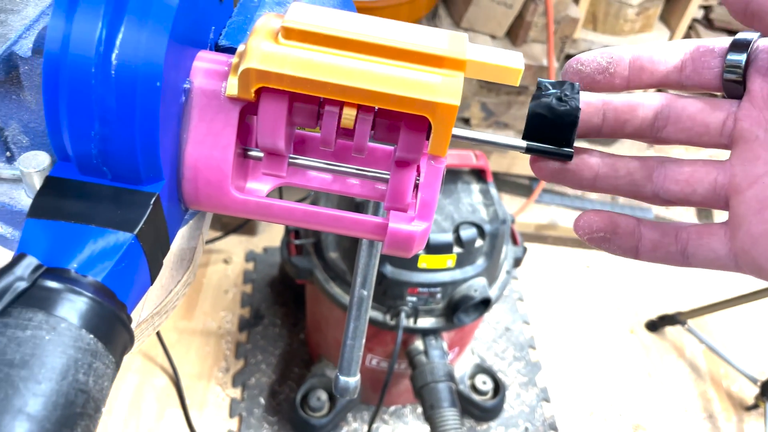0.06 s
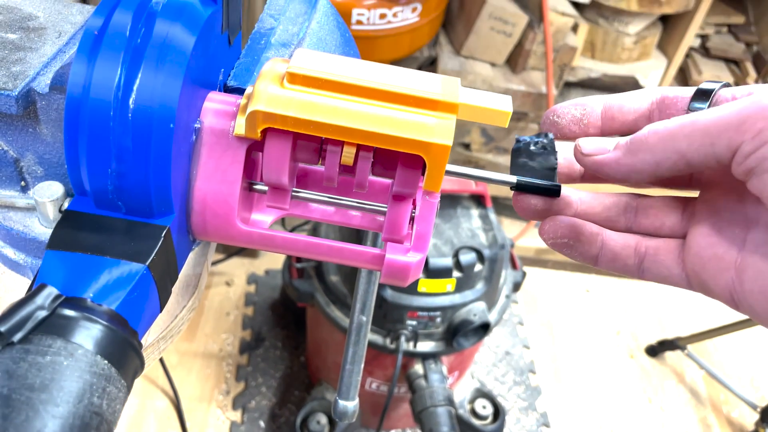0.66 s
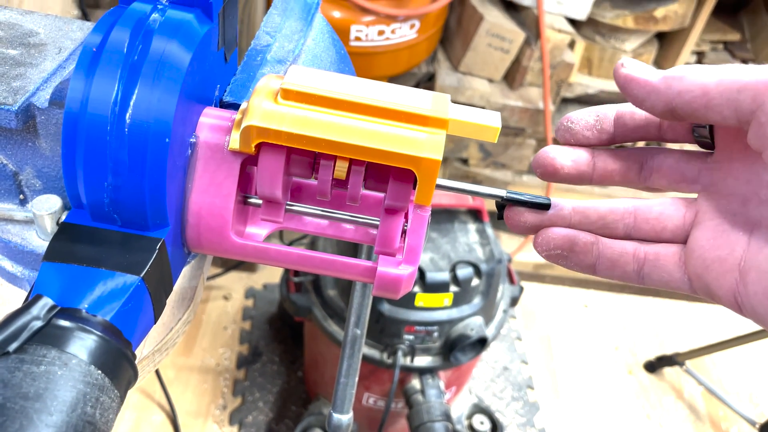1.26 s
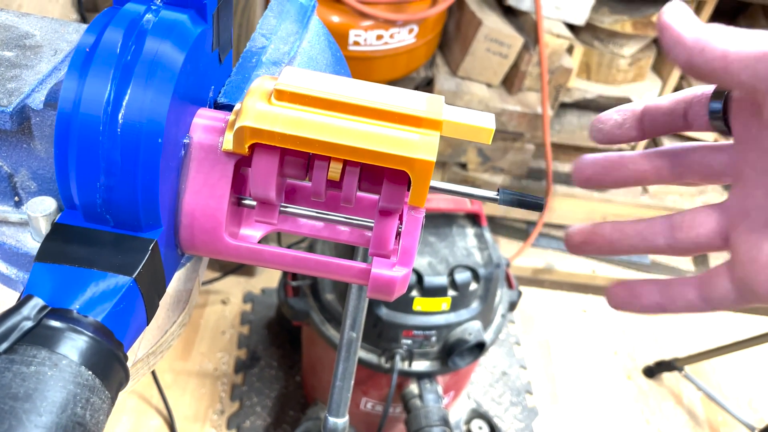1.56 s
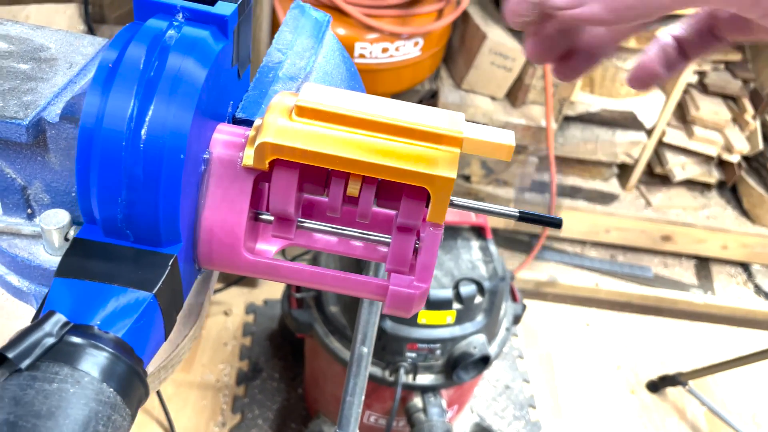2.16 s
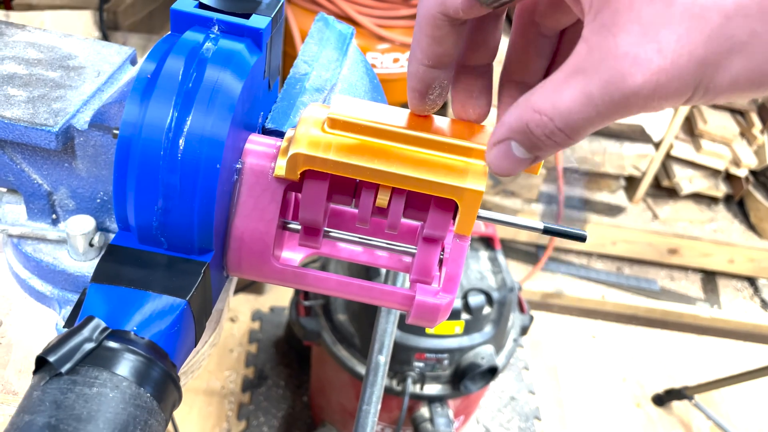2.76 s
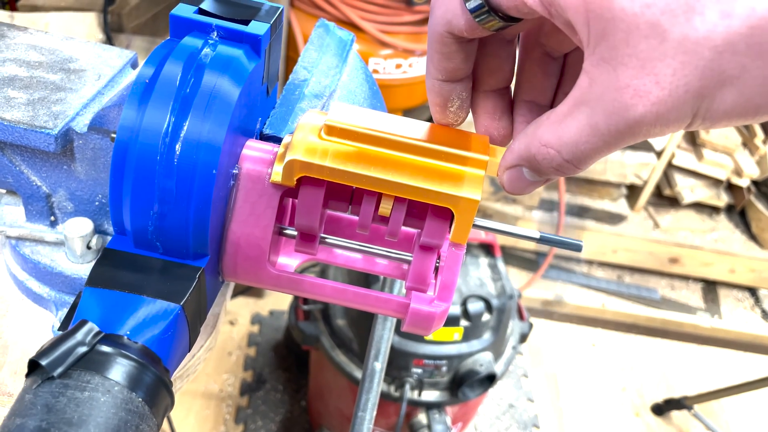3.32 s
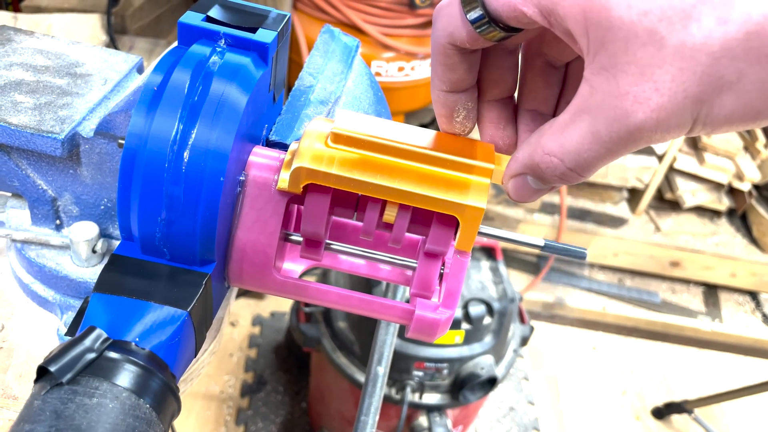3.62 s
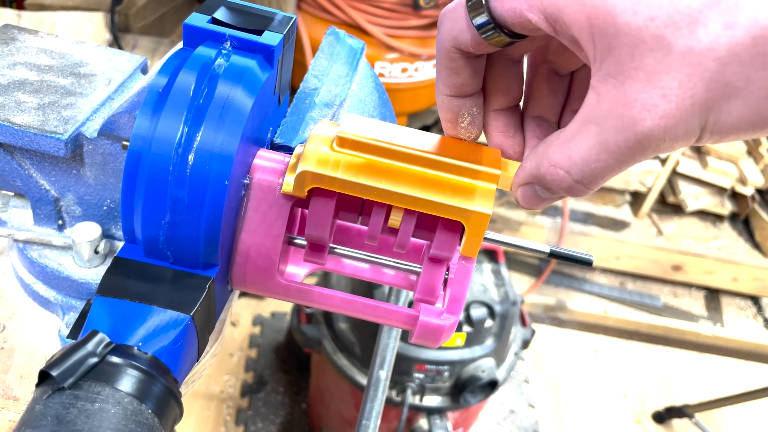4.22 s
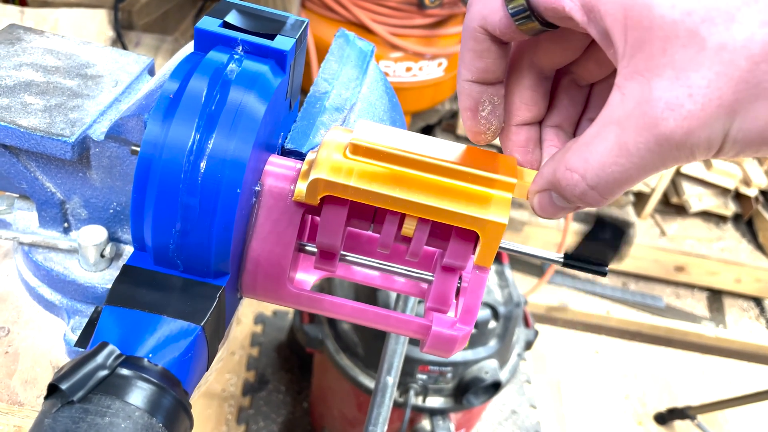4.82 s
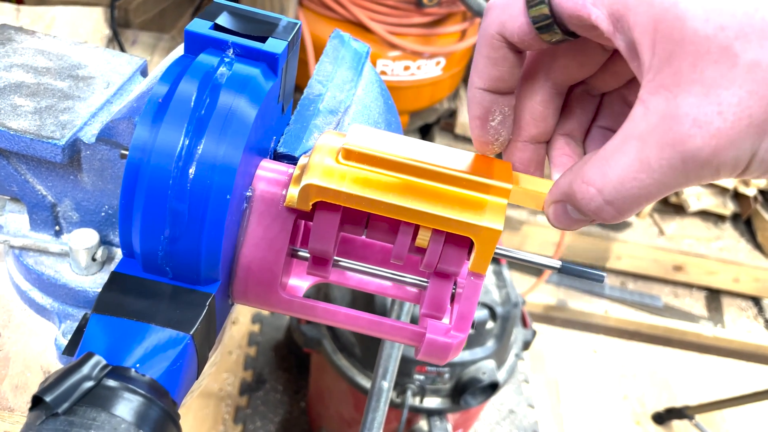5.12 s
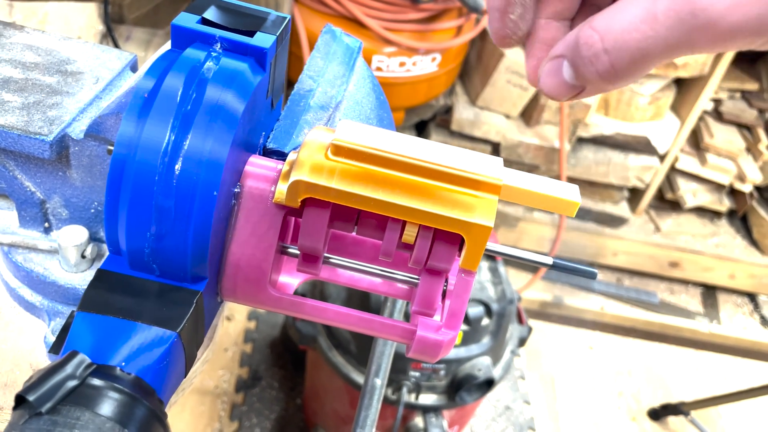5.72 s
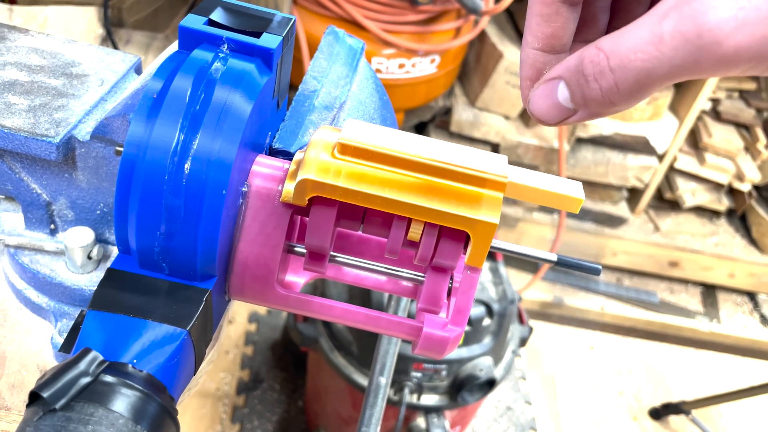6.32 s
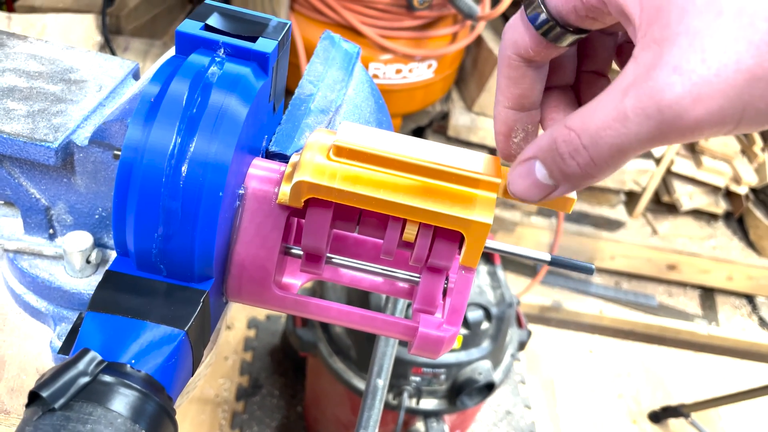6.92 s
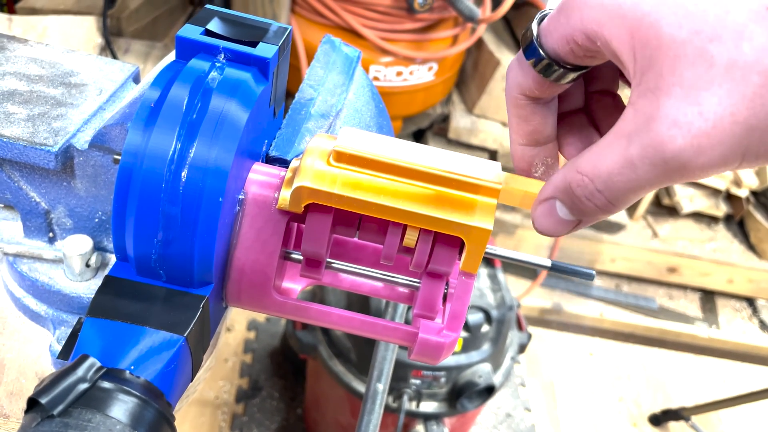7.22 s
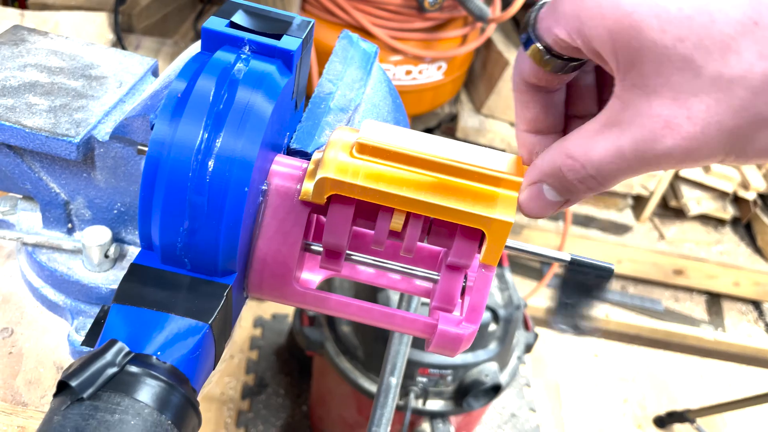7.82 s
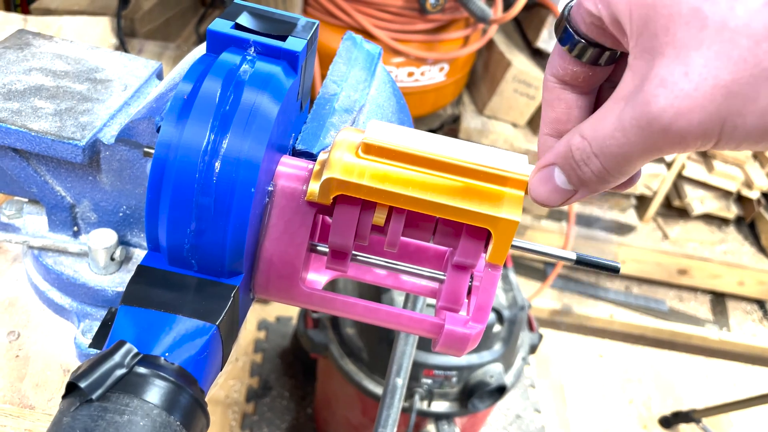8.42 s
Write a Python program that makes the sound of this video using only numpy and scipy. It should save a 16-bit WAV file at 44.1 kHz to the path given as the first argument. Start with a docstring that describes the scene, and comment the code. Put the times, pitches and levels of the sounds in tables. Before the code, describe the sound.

Close up on a workbench, a small air turbine spins with a high, whistling whine over the constant drone and rushing air of a shop vacuum. Midway, a plastic gearbox is shifted and its teeth grind in several stretches while the whine wavers and sinks and the whistle fades. Then the rasp ends, the pitch rises again, and a faint shaft hum sounds briefly as the vacuum runs on.

```python
"""On a workbench, a shop vacuum sucks air through a small plastic turbine that drives a plastic gearbox.
Over the vacuum's hum, roar and hiss the blades whine, swelling and dipping in the wall echoes.
The housing whistles, and rings when an overtone sweeps through its resonance.
A hand shifts the gears: they rasp, the turbine sags and recovers, and the slow shaft hums while engaged."""
import sys
import numpy as np
from scipy import signal
from scipy.fft import rfft, irfft, next_fast_len
from scipy.io import wavfile
from scipy.ndimage import uniform_filter1d, map_coordinates

SR = 44100
rng = np.random.default_rng(int(sys.argv[2]) if len(sys.argv) > 2 else 0)


def output_pcm(signal):
    """Save a mono or channel-first signal as 16-bit PCM at the path in sys.argv[1].

    Samples are clipped to [-1, 1] before scaling.
    """
    pcm = np.clip(np.atleast_2d(signal).T, -1, 1) * 32767
    wavfile.write(sys.argv[1], SR, np.round(pcm).astype(np.int16))


N = 382347
FREE_HZ = 1183  # blade rate with no load
# treble comes straight from the turbine and reaches the right microphone first: f/Hz, left lead/rad
TREBLE_LEAD = [(5800, 0), (7000, -1.6), (8300, -3.14), (9600, -4.7), (11600, -6.28), (13200, -7.85),
               (14700, -9.42), (15800, -10.5)]


def amp(db):
    """Decibels to gain."""
    return 10 ** (np.asarray(db) / 20)


def unit(x):
    """Scale to rms 1."""
    return x / np.sqrt(np.mean(x ** 2) + 1e-20)


def along(points, hz):
    """Read (f/Hz, value) points on a log axis."""
    f, v = np.transpose(points)
    return np.interp(np.log(hz + 1), np.log(f + 1), v)


def curve(points):
    """Read (t/s, value) points at every sample."""
    return np.interp(np.arange(N) / SR, *np.transpose(points))


def wobble(rate):
    """A smooth random curve, rate knots a second."""
    return map_coordinates(rng.standard_normal(int(N * rate / SR) + 4), [np.arange(N) * rate / SR])


def gate(start, end, rise_s, fall_s):
    """Fully open by the start, fading after the end."""
    t = np.arange(N) / SR
    return np.clip(np.minimum(1 + (t - start) / rise_s, 1 - (t - end) / fall_s), 0, 1)


def filtered(x, response):
    """Shape x by a frequency response."""
    m = next_fast_len(N + 8192)
    return irfft(rfft(x, m) * response(np.fft.rfftfreq(m, 1 / SR)), m)[..., :N]


def resonant(points, modes, hz):
    """A smooth spectrum in dB with resonance peaks on it."""
    peaks = sum((amp(db) ** 2 - 1) / (1 + (2 * (hz - centre) / width) ** 2) ** 1.49
                for centre, width, db in modes)
    return along(points, hz) + 10 * np.log10(np.abs(1 + peaks))


def angle(hz):
    """Running phase of a gliding pitch."""
    return 2 * np.pi * np.cumsum(hz) / SR


def tone(phase, pan_db, lead):
    """A stereo sine, louder on the left by pan_db and earlier by lead radians."""
    side = np.array([[.5], [-.5]])
    return np.sqrt(2) * amp(side * pan_db) * np.sin(phase + side * lead)


def rush(colour_db, patchy_db):
    """Stereo noise of rms 1 with turbulent patches."""
    likeness = [(60, .97), (300, .92), (900, .75), (1500, .7), (2500, .35), (4200, .88), (6000, .8),
                (7700, .99)]  # f/Hz, left-right likeness
    balance = [(400, -.5), (700, -1), (1150, 4.5), (1600, 0.5), (2300, 9), (3300, 4.5), (4200, 3.5),
               (5500, 5.5), (6800, -1.5), (7700, 0)]  # f/Hz, L-R/dB
    noise = signal.stft(rng.standard_normal((2, N)), nperseg=512)[2]
    patches = uniform_filter1d(rng.standard_normal(noise.shape[1:]), size=5, axis=0)
    patches = unit(uniform_filter1d(patches, size=12, axis=1))
    pair = signal.istft(noise * amp(patchy_db * patches), nperseg=512)[1][:, :N]
    spread = lambda hz: np.arccos(np.clip(along(likeness, hz), -1, 1)) / 2
    mid, side = filtered(pair, lambda hz: amp(colour_db(hz)) * [np.cos(spread(hz)), np.sin(spread(hz))])
    half = np.array([[.5], [-.5]])
    place = lambda hz: amp(half * along(balance, hz)) * np.exp(1j * half * along(TREBLE_LEAD, hz))
    return unit(filtered(np.array([mid + side, mid - side]), place))


def turbine(blade_hz, load):
    """The blades whine; chattering gears shake the rotor, so the pitch wavers."""
    overtones = [(3, -39.5), (4, -35.5), (5, -36.5), (6, -37), (7, -44), (8, -44.5), (9, -47), (10, -46.5),
                 (11, -47), (12, -45.5), (13, -46.5), (14, -48), (15, -52), (16, -52)]  # ahead of the housing's lift: multiple, relative level/dB
    octaves = np.log2(blade_hz / FREE_HZ)
    shake = (.01 + .015 * load) * wobble(170) + .07 * load * wobble(55)
    phase = angle(blade_hz * (1 + 0.000485 * wobble(14) + .002 * load * wobble(45))) + shake
    blade = amp(-30.5 + 6 * octaves + swell(1) + (0.5 + 1.4 * load) * wobble(30))
    second = amp(-36.5 + 8.5 * octaves + swell(2) + (1 + 2.4 * load) * wobble(30))
    whine = blade * tone(phase, pan_db=6.5, lead=0.24) + second * overtone(2, phase, blade_hz)
    whine += amp(0.5) * wall_echoes(blade * np.sqrt(2) * np.sin(phase))
    # the uneven rotor adds a faint tone between the blade tones
    blades, rotor_order = 6, 11
    rotor = amp(-46.5 - 6.1 * load + 3.4 * wobble(8))
    whine += rotor * tone(phase * rotor_order / blades, pan_db=6.5, lead=2.5)
    for k, db in overtones:
        hz = k * blade_hz
        level_db = db - 3 + housing(hz, blade_hz, load) + octaves + swell(k)
        # the shrillest overtones sink into the hiss as the turbine sags
        sheen_db = 11 * octaves * np.clip((hz - 8000) / 1000, 0, 1)
        # turbulence makes the short waves flutter most
        flutter_db = (0.65 + 0.096 * k + 0.74 * load) * wobble(22) + wobble(90) + wobble(5)
        whine += amp(level_db + sheen_db + flutter_db) * overtone(k, phase, blade_hz)
    return whine


def swell(k):
    """Lift in dB as multiple k of the blade tone flares or fades for a while."""
    swells = { 1: [(3.92, 3.94, -1), (4.2, 4.29, -1.5), (4.4, 4.47, -4), (4.96, 5.02, 4.5),
              (5.88, 5.95, -2.5), (6.19, 6.21, -4)], 2: [(1.597, 2.53, 6), (3.14, 3.17, -4),
              (3.39, 3.56, -3.5), (3.61, 3.67, 5), (3.76, 3.81, -12), (4.04, 4.09, -2), (4.45, 4.54, -6),
              (4.65, 4.97, 4), (5.27, 5.29, -4), (5.4, 5.415, -5), (5.545, 5.56, -8), (5.6, 5.63, 5),
              (5.67, 5.73, -12), (5.96, 6.02, 6), (6.08, 6.11, -13), (6.19, 6.28, 2), (6.33, 6.36, -5),
              (6.42, 7.87, 3.5), (6.7, 6.73, -5), (7.38, 7.42, -6)], 3: [(0.35, 0.53, -9), (1.55, 1.72, -6),
              (2.2, 2.33, 3.5), (2.56, 3.12, -3), (4.24, 4.31, 8), (5.9, 6.1, 5.5), (6.19, 6.24, -7),
              (7.8, 8.67, -3.5), (7.81, 7.87, -3), (8.1, 8.14, -9)], 4: [(1.65, 2.0, -4), (2.12, 2.2, 3),
              (3.26, 3.33, 2), (3.37, 3.47, -4), (3.9, 3.95, -9), (4.4, 5.36, -4), (5.45, 5.78, 2.5),
              (5.98, 6.11, -3), (6.14, 6.28, 4), (7.45, 7.72, 2.5)], 5: [(1.66, 2.05, -6), (4.3, 5.22, 1),
              (5.28, 5.35, 2.5), (5.41, 5.46, 0), (5.62, 5.7, 4), (5.9, 6.42, -9), (6.5, 7.7, 0.5),
              (8.0, 8.6, -3)], 6: [(3.35, 3.55, -1.5), (4.88, 4.97, -1), (5.07, 5.22, -6), (6.33, 6.5, -8)],
              8: [(5.27, 5.42, 11)]}  # by multiple: start/s, end/s, lift/dB
    return sum(db * gate(start, end, rise_s=.027, fall_s=.054) for start, end, db in swells.get(k, []))


def overtone(k, phase, blade_hz):
    """Multiple k of the blade tone, placed in stereo by its pitch."""
    pan = [(1500, -3), (2300, 9.5), (3500, 2.5), (4000, 3.5), (4700, 7), (5500, 2), (7000, 4), (7700, 0)]  # f/Hz, L-R/dB
    lead = [(700, .5), (1100, .3), (1200, .9), (1800, .5), (2350, 2.3), (2900, 2.6), (3250, .8), (4200, .2),
            (4700, .7)]  # f/Hz, left lead/rad
    return tone(k * phase, along(pan, k * blade_hz), along(lead + TREBLE_LEAD, k * blade_hz))


def wall_echoes(x):
    """The walls return a tone late, so the mix swells and dips as its pitch slides."""
    walls = [(5.027, .162), (15.802, .315), (17.426, .328), (20.509, .137), (30.59, .147), (48.977, .071)]  # reflections: delay/ms, relative gain
    t = np.arange(N) / SR
    return sum(gain * np.interp(t - ms / 1000, t, x, left=0) for ms, gain in walls)


def housing(hz, blade_hz, load):
    """An overtone's lift in dB; the main resonance spreads upward with the flow, the hand damps it."""
    colour = [(2100, 1), (3000, -1.5), (3500, 1.5), (3950, .5), (4400, -1), (4750, -1.3), (5050, -3),
              (5400, -9), (5900, -3), (6150, 1), (6500, 2), (7100, -16), (8700, -10), (9050, -2), (9450, 5),
              (9900, -7), (10250, -5), (10650, 5), (11200, 1.5), (11850, 6), (12400, 2.5), (13000, 1.5),
              (13600, -4), (15400, -14)]  # f/Hz, lift/dB
    width_hz = 322 * (blade_hz / FREE_HZ) ** 2
    centre_hz = 4081 + 0.71 * width_hz
    peak_db = 17 - 4.5 * load ** 2
    return along(colour, hz) + peak_db / (1 + ((hz - centre_hz) / width_hz) ** 2)


def whistle(blade_hz):
    """The inlet jet locks loosely to the housing resonance and fades as the turbine sags."""
    level_db = np.maximum(-28.5 - 0.04 * (FREE_HZ - blade_hz), -56)
    phase = angle(4160 + 11 * wobble(17) + 23 * wobble(110) + 42 * wobble(450))
    jet = tone(phase, pan_db=2.5, lead=.1)
    sideband = amp(-16.5) * tone(phase + angle(blade_hz), pan_db=-8, lead=0)  # blades chop the jet
    return amp(level_db + 0.33 * wobble(60) + 2.7 * wobble(260)) * (jet + sideband)


def drum_roar(load):
    """Air roars in the vacuum's drum and hose, a little louder under load."""
    bed = [(25, -24), (55, -5), (95, -8), (135, -2.5), (450, 1), (660, -3.5), (1200, 1), (1850, -10.5),
           (4000, -47)]  # roar spectrum: f/Hz, relative level/dB
    drum_modes = [(149, 11, 5), (182, 18, 7.5), (244.5, 26, 8), (304, 22, 7), (350, 10, 1), (463, 53, 3),
                  (826, 100, 11.5)]  # f/Hz, width/Hz, lift/dB
    level_db = -38.5 + load + 0.32 * wobble(6.7)
    return amp(level_db) * rush(lambda hz: resonant(bed, drum_modes, hz), patchy_db=2)


def air_hiss(blade_hz):
    """Air hisses through the turbine housing, louder with speed."""
    bed = [(500, -25), (1300, 1.5), (1850, 1.5), (2600, 5.5), (3600, 0.5), (4800, 2.5), (5900, -0.5),
           (7000, 2.5)]  # hiss spectrum: f/Hz, relative level/dB
    top = [(7450, 2), (7800, -29.5), (8650, -30), (9100, 3.5), (10000, -3.5), (11500, -1.5), (13000, -5),
           (14000, -6), (15800, -41)]  # its fizzy top: f/Hz, relative level/dB
    duct_modes = [(3095, 370, 5), (4200, 470, 17), (5100, 180, 3.5), (6470, 160, 9.5)]  # f/Hz, width/Hz, lift/dB
    level_db = -28.5 + 4.5 * np.log2(blade_hz / FREE_HZ) + 0.12 * wobble(6.7)
    return amp(level_db) * rush(lambda hz: resonant(bed + top, duct_modes, hz), patchy_db=1.25)


def motor(): 
    """The vacuum's motor drones, its tones drifting slightly together."""
    partials = [(122.5, -62, 3, 0.46), (243.3, -55, -1, 0), (596.2, -35, 2.5, 0.94), (6470, -56.5, 15, 0.1)]  # nominal f/Hz, level/dB, L-R/dB, left lead/rad
    speed = 1 + 0.000426 * wobble(3.02) + curve([(0, -.0062), (1.5, .0011), (5, .001), (8.67, .0024)])
    return sum(amp(db + 0.41 * wobble(8.6)) * tone(angle(hz * speed), pan, lead)
               for hz, db, pan, lead in partials)


def gears(blade_hz, grind):
    """Plastic teeth rasp unevenly; the engaged slow shaft hums at its turning rate."""
    colour = [(150, -15), (500, -2), (900, -4.5), (1250, 2), (1600, 1), (2100, -2), (3200, 5), (3700, -4),
              (4150, 3), (4700, 6), (5500, -1), (7300, -1.5), (8200, -30), (9200, -5), (11000, -9),
              (13200, -14), (15800, -37)]  # rasp spectrum: f/Hz, relative level/dB
    engaged = [(3.3, 3.48, -50), (5.62, 7.746, -49)]  # shaft hum: start/s, end/s, level/dB
    shaft = angle(blade_hz / 17.4)  # blade passes per shaft turn
    chatter = amp(1.5 * wobble(350) + .7 * wobble(30) + np.sin(shaft))
    rasp = unit(chatter * rush(lambda hz: along(colour, hz), patchy_db=1.6))
    hum = sum(amp(db) * gate(start, end, rise_s=.14, fall_s=.05) for start, end, db in engaged)
    return grind * rasp + hum * tone(shaft, pan_db=0.5, lead=0)


def scene():
    """Turbine speed and grinding load drive every layer but the motor."""
    speed = [(0.0, 1180.6), (0.259, 1179.9), (0.409, 1172.1), (0.713, 1182.1), (1.172, 1188.6),
             (1.571, 1173.5), (2.24, 1189.9), (2.405, 1184.0), (2.479, 1189.0), (2.804, 1182.2),
             (2.998, 1184.3), (3.063, 1186.1), (3.123, 1175.7), (3.477, 1046.2), (3.592, 1010.6),
             (3.756, 976.0), (3.806, 971.3), (3.901, 990.2), (4.056, 982.1), (4.205, 917.1), (4.305, 894.8),
             (4.375, 857.9), (4.455, 842.7), (4.52, 819.7), (4.639, 801.2), (4.719, 771.0), (4.814, 776.6),
             (5.024, 701.4), (5.039, 711.4), (5.103, 791.5), (5.203, 773.4), (5.288, 825.3), (5.393, 830.4),
             (5.557, 968.5), (5.607, 1000.6), (5.647, 1015.5), (5.867, 1064.2), (6.301, 1112.3),
             (6.425, 1122.0), (6.785, 1135.0), (7.313, 1133.2), (7.423, 1126.6), (7.722, 1122.5),
             (7.847, 1144.6), (8.132, 1177.4), (8.276, 1186.0), (8.456, 1177.3), (8.67, 1183.5)]  # blade rate: t/s, f/Hz
    grinds = [(3.11, 3.27, -31), (3.3, 3.5, -37.5), (3.53, 4.203, -31.5), (4.218, 5.0, -28),
              (5.058, 5.47, -34.5)]  # gears pressed together: start/s, end/s, level/dB
    blade_hz = curve(speed)
    presses = [amp(db) * gate(start, end, rise_s=.09, fall_s=.14) for start, end, db in grinds]
    grind = np.max(presses, axis=0)
    load = grind / grind.max()
    machine = turbine(blade_hz, load) + whistle(blade_hz) + gears(blade_hz, grind)
    return machine + drum_roar(load) + air_hiss(blade_hz) + motor()


def record(dry):
    """A brick-wall low-pass trims the very top."""
    return filtered(dry, lambda hz: hz < 15800)


dry = scene()
out = record(dry)
output_pcm(out)
```